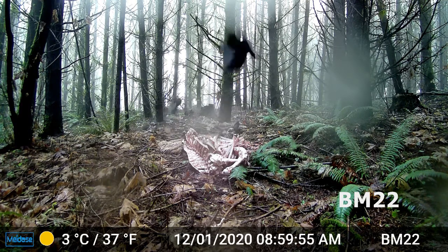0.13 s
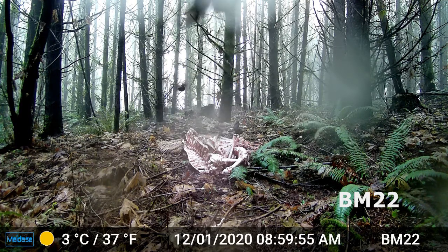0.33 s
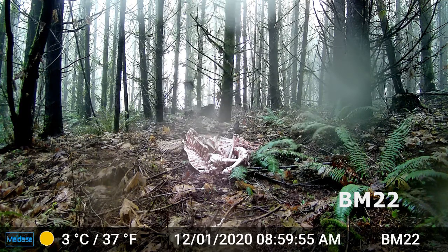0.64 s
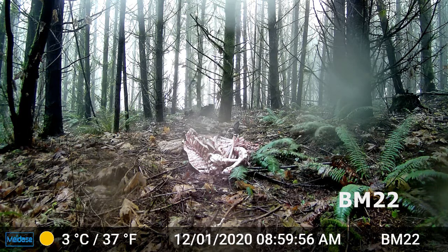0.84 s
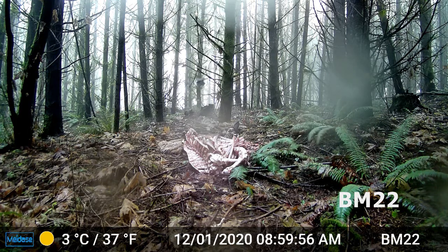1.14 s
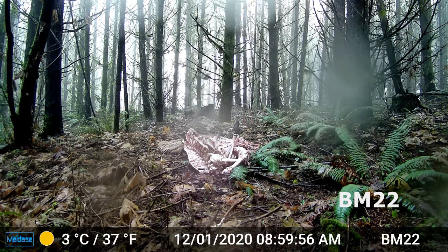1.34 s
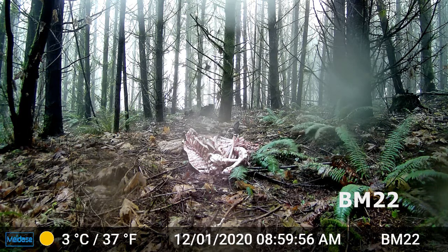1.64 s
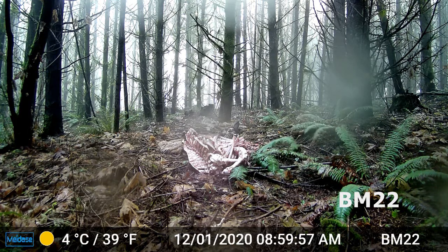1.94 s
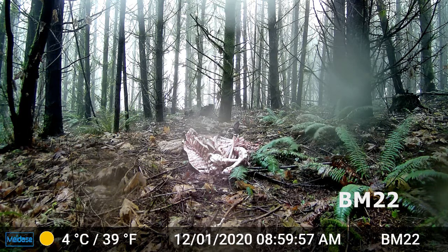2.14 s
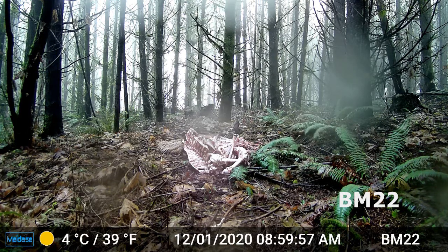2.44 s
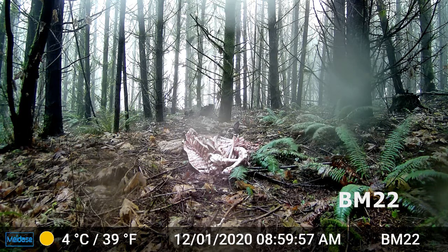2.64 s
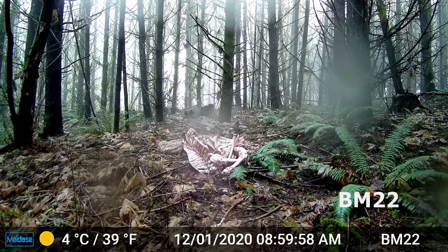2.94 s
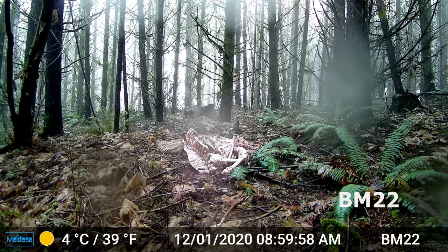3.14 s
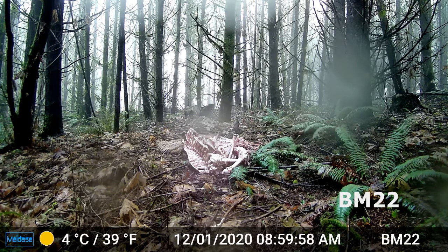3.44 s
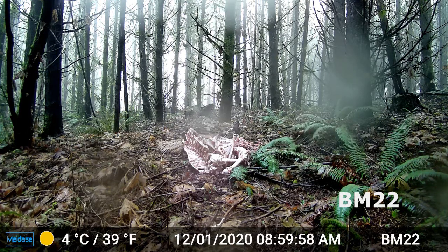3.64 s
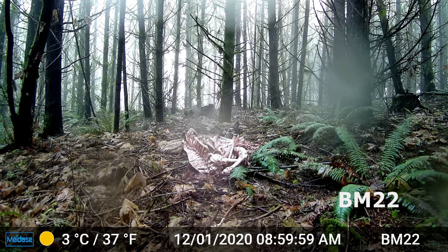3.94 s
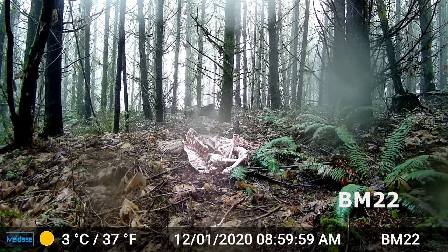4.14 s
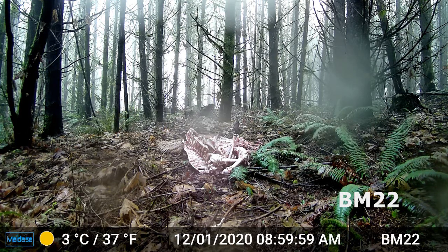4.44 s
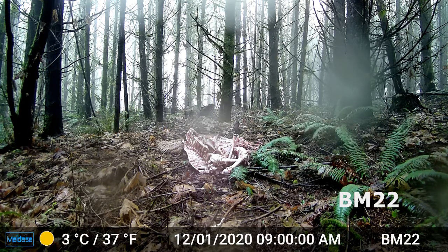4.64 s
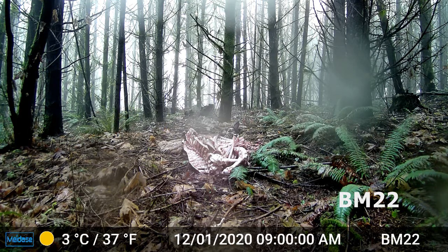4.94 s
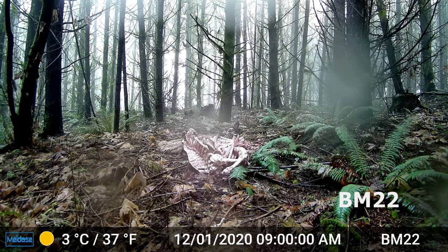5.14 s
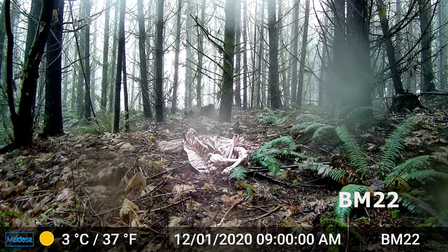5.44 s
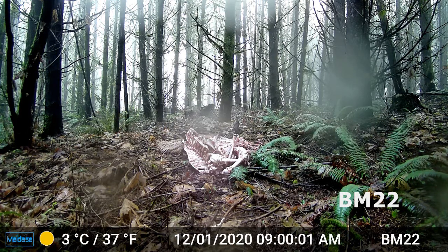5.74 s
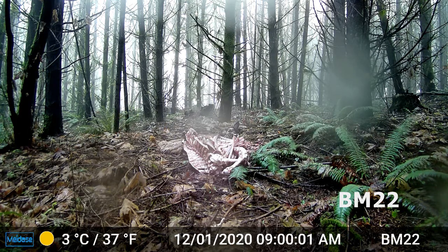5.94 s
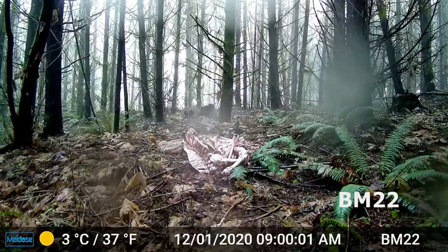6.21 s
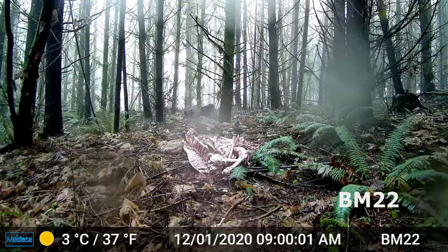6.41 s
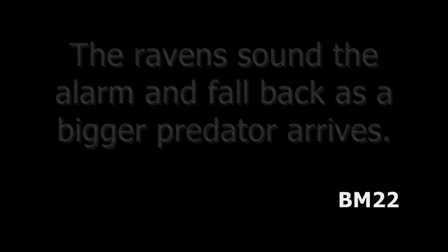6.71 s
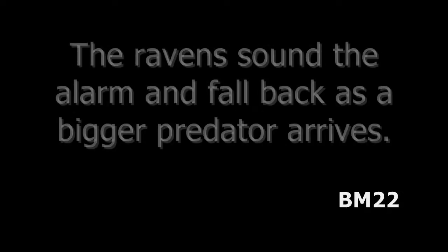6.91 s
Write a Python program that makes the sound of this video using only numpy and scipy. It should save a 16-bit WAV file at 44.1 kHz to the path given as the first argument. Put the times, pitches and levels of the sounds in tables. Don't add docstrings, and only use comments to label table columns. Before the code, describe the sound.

Close wing flaps, loud hoarse raven alarm caws, fainter distant answers, a quiet gap, then three more rough caws, cut off mid-call.

```python
import sys
import numpy as np
from scipy import signal
from scipy.fft import rfft, irfft, next_fast_len
from scipy.io import wavfile
from scipy.ndimage import map_coordinates

SR = 44100
rng = np.random.default_rng(int(sys.argv[2]) if len(sys.argv) > 2 else 0)


def invert_db(level):
    return 10 ** (np.asarray(level, dtype=float) / 20)


def transcribe(u):
    v = np.clip(np.atleast_2d(u).T, -1, 1)
    q = np.round(v * 32767).astype(np.int16)
    wavfile.write(sys.argv[1], SR, q)


N = 311787
TIME = np.arange(N) / SR

# centre_hz, width_hz, level_db
NEAR_PIPE = [(460, 370, -9.5), (1015, 460, 0.5), (1381, 387, 2.5)]
# centre_hz, width_hz, level_db
NEAR_BEAK = [(2610, 520, 0.8), (3780, 850, -1)]



def unit(x):
    return x / np.sqrt(np.mean(x ** 2) + 1e-20)


def along(points, hz):
    f, v = np.transpose(points)
    return np.interp(np.log(hz + 1), np.log(f + 1), v)


def wobble(rate_hz):
    knots = rng.standard_normal(int(N * rate_hz / SR) + 4)
    return map_coordinates(knots, [TIME * rate_hz])


def filtered(x, response):
    m = next_fast_len(N + SR // 2)
    hz = np.fft.rfftfreq(m, 1 / SR)
    return irfft(rfft(x, m) * response(hz), m)[..., :N]


def hiss(spectrum):
    return unit(filtered(rng.standard_normal(N), lambda hz: invert_db(along(spectrum, hz))))


def resonate(x, modes):
    def response(f):
        total = 0
        for k, (centre, width, db) in enumerate(modes):
            band = 1j * f * width
            total = total + (-1) ** k * invert_db(db) * band / (centre ** 2 - f ** 2 + band)
        return total
    return filtered(x, response)


def wind():
    # time_s, strength_db
    gusts = [(0.0, -45), (0.11, -34), (0.22, -43.5), (0.33, -27), (0.37, -45), (0.91, -41.5), (1.32, -52.5),
             (1.93, -42.5), (1.95, -53), (2.3, -39.5), (2.38, -51), (2.75, -30), (2.99, -47.5), (3.08, -36),
             (3.25, -41), (3.31, -30.5), (3.53, -48.5), (6.67, -46.5)]
    # freq_hz, density_db
    hush = [(76, -24.5), (130, -3.5), (175, -10.5), (205, -17), (339, -19.5), (419, -22.5), (593, -21),
            (1350, -29.5), (5170, -35), (8420, -42), (10900, -70.5), (18500, -120)]
    s, strength_db = np.transpose(gusts)
    mean_db = strength_db.mean()
    gust_db = np.interp(TIME, s, strength_db) - mean_db
    deep = hiss([(12, -44.0), (22, 6.5), (50, 2.5), (75, -30.0), (200, -120)])
    deep = unit(invert_db(3 * wobble(9.7)) * deep)
    upper = hiss([(30, -32.5), (58, 7.0), (110, -1), (170, -23.5), (260, -33), (600, -120)])
    upper = unit(invert_db(4 * wobble(14)) * upper)
    buffet = invert_db(-0.5 + 1.4 * gust_db) * deep + invert_db(0.6 * gust_db) * upper
    return invert_db(mean_db) * buffet + invert_db(-52 + wobble(5)) * hiss(hush)


def forest(x, early_db, late_db):
    # freq_hz, level_db
    scatter = [(500, -10), (1400, -10), (2500, -2), (6000, -1)]
    # freq_hz, t60_s
    trunks = [(300, .6), (600, .9), (1150, 1.75), (2500, 1.25), (6000, .8)]
    # delay_s, level_db
    echoes = [
        (.06, -27),
        (.19, -32),
    ]
    hz, t, z = signal.stft(rng.standard_normal(2 * SR), SR, nperseg=256)
    early = invert_db(early_db - 1.5 + along(scatter, hz)[:, None] - 60 * t / .42)
    late = invert_db(late_db - 60 * t / along(trunks, hz)[:, None])
    tail = signal.istft(z * (early + late), SR, nperseg=256)[1] / 50
    tail[:150] = 0
    blurs = rng.standard_normal((len(echoes), 2000)) * np.hanning(2000) / 27
    for (s, db), blur in zip(echoes, blurs):
        tail[round(s * SR) - 1000:][:2000] += invert_db(db) * blur
    return x + signal.fftconvolve(x, tail)[:N]


def wings():
    # time_s, thump_db, thump_hz, swish_db, length_s
    beats = [(.01, -30.5, 128, -40, 0.19), (.045, -27.5, 166.6, -31, 0.24), (0.062, -21, 121, -37.5, 0.053),
             (0.11, -17, 108, -38.5, 0.051), (.13, -33, 120, -23, 0.01), (.155, -22, 148, -28, 0.026),
             (.19, -25.5, 108, -44.5, .04), (.243, -18.5, 130, -45.5, 0.026),
             (.265, -29.5, 120, -26.5, .05), (.287, -28.5, 110, -33.5, .03), (.33, -19, 103.4, -40.5, 0.06),
             (.66, -34.5, 129, -39, 0.19), (0.721, -15, 164, -41, 0.018), (0.858, -20, 105, -47, 0.026),
             (0.944, -20.5, 149, -43, 0.035), (1.846, -44, 101, -43.5, 0.095),
             (1.911, -33, 70.6, -43.5, 0.046), (2.081, -49.5, 98.4, -49.5, 0.17)]
    # time_s, peak_db
    snap_events = [
        (0.0418, -17.5),
        (0.0594, -16),
        (0.1246, -27.5),
        (0.2433, -37),
        (0.2848, -14.5),
    ]
    # freq_hz, density_db
    feathers = [(180, -42), (300, 1), (891, -8.5), (1530, 0), (1950, -10), (3080, -8.5), (6740, -19),
                (8420, -28), (10900, -50.5), (18500, -120)]
    thump, swish, snaps = np.zeros((3, N))
    for s, thump_db, hz, swish_db, length_s in beats:
        since = TIME - s
        stroke = np.exp(-8 * (since / length_s) ** 2)
        puff = np.sin(2 * np.pi * hz * since) + 0.38 * np.sin(4 * np.pi * hz * since)
        thump += invert_db(thump_db) * stroke * puff
        swish += invert_db(swish_db) * stroke
    for s, db in snap_events:
        decay = invert_db(db + 6.5 - 60 * TIME[:200] / .003)
        snaps[round(s * SR):][:200] += decay * rng.standard_normal(200)
    rustle = swish * invert_db(3 * wobble(150)) * hiss(feathers)
    return thump + rustle + resonate(snaps, [(2500, 5000, 0)])


def arched(u, before, place, after):
    rising = np.clip(1 - u / place, 0, 1)
    falling = np.clip((u - place) / (1 - place), 0, 1)
    return before * rising ** 2 + after * falling ** 2


def raven(caws, way, pipe, beak, opened, rise, fall, gap_db, arch, jitter, breath, rasp, uneven, restarts=False):
    # centre_hz, width_hz, level_db
    gape = [(5016, 996, 1), (7590, 400, -16)]
    low, mid, top = np.zeros((3, N))
    shake, air = wobble(400), rng.standard_normal(N)
    for start_s, length_s, top_hz, top_db, first_hz in caws:
        at = np.arange(round(start_s * SR), round((start_s + length_s) * SR))
        u = np.linspace(0, 1, len(at))
        since_s = u * length_s

        last_hz, after_s = way["slows"]
        rattle_hz = last_hz + (first_hz - last_hz) * np.clip(1 - since_s / after_s, 0, 1)
        bursts = np.cumsum(rattle_hz) / SR
        within = bursts % 1 / np.linspace(*opened, len(at))
        swell = np.sin(np.pi / 2 * np.clip(within / rise, 0, 1)) ** 2
        decay = np.abs(np.cos(np.pi / 2 * np.clip((within - rise) / (1 - rise), 0, 1))) ** fall
        leak = invert_db(gap_db) * np.linspace(.4, 1.7, len(at))
        leak *= 1 - restarts * np.cos(np.pi * bursts) ** 2
        gate = (swell * decay + leak) * invert_db(1.2 * rng.standard_normal(64))[bursts.astype(int)]

        bend = 1 + arch * np.sin(2 * np.pi * bursts - .5) + jitter * shake[at]
        cycles = np.cumsum(top_hz * (1 - arched(u, *way["pitch"])) * bend) / SR
        cycles -= restarts * cycles[np.searchsorted(bursts, np.floor(bursts))] + .5
        harmonics = np.arange(1, 17)[:, None]
        pulses = np.cos(2 * np.pi * harmonics * cycles).sum(0) / np.sqrt(8)
        pulses *= 1 + uneven * np.cos(np.pi * cycles)
        puffs = air[at] * (1 + np.cos(2 * np.pi * cycles))

        onset = invert_db(-11 * np.clip(1 - since_s / way["swell_s"], 0, 1))
        release = np.clip((at[-1] - at) / (.008 * SR), 0, 1)
        effort = onset * release * invert_db(top_db - arched(u, *way["effort"]))
        leaky_gate = gate + invert_db(gap_db + 8)
        beak_gain = invert_db(np.linspace(*way["opens_db"], len(at)))
        hoarse = effort * beak_gain * (gate * pulses + rasp * leaky_gate * puffs)
        low[at] += effort * gate * (pulses + breath * puffs)
        mid[at] += hoarse
        top[at] += hoarse * invert_db(way["gape_db"])
    throat = signal.butter(3, [340, 2250], "bandpass", fs=SR, output="sos")
    low = signal.sosfilt(throat, resonate(low, pipe))
    mid = resonate(resonate(mid, beak), beak)
    top = resonate(resonate(top, gape), gape)
    return invert_db(14.0) * low + invert_db(3.5) * mid - invert_db(1.0) * top


def far_raven():
    # start_s, length_s, top_pitch_hz, top_effort_db, first_rattle_hz
    caws = [
        (2.885, .24, 548.9, -7.5, 100.1),
        (3.402, .23, 564.9, -8.5, 98.37),
    ]
    way = dict(pitch=(.25, .48, .2), effort=(11, 0.54, 7.2), slows=(51, .145), opens_db=(-32.5, -11),
           gape_db=-9, swell_s=.04)
    # centre_hz, width_hz, level_db
    pipe = [(530, 2100, -17), (1139, 145, 3.5), (1521, 300, -12.5)]
    # centre_hz, width_hz, level_db
    beak = [(2743, 500, 0.82), (4070, 820, -1.3)]
    return raven(caws, way, pipe, beak, (.55, .68), rise=.4, fall=1.3, gap_db=-11,
                 arch=.04, jitter=.03, breath=.5, rasp=2.6, uneven=.15)


def muttering_raven():
    # start_s, length_s, top_pitch_hz, top_effort_db, first_rattle_hz
    caws = [
        (0.718, .182, 413, -10, 92.8),
        (1.364, .146, 422.5, -13.5, 101.8),
    ]
    way = dict(pitch=(.2, 0.98, .03), effort=(12, 0.8, 4.5), slows=(47, 0.25), opens_db=(-26.5, -21.5),
           gape_db=-14, swell_s=0.013)
    # centre_hz, width_hz, level_db
    pipe = [(430, 290, -19.5), (680, 300, -14.5), (1153, 250, -2.5), (1304, 260, -3)]
    # centre_hz, width_hz, level_db
    beak = [(2420, 730, -1.5), (3400, 630, 0.5)]
    return raven(caws, way, pipe, beak, (.8, 1.1), rise=.4, fall=1, gap_db=-12,
                 arch=.025, jitter=.036, breath=.8, rasp=2, uneven=.3)


def answering_raven():
    # start_s, length_s, top_pitch_hz, top_effort_db, first_rattle_hz
    caws = [
        (2.34, .345, 451.5, -22.5, 56.1),
    ]
    way = dict(pitch=(.11, .5, 0.22), effort=(2, 0.077, 17), slows=(44, .25), opens_db=(-4.5, -6.5),
           gape_db=-6, swell_s=0.075)
    return raven(caws, way, NEAR_PIPE, NEAR_BEAK, (1.1, 1.5), rise=.3, fall=.7, gap_db=-6,
                 arch=.04, jitter=.04, breath=.9, rasp=2, uneven=.35)


def high_raven():
    # start_s, length_s, top_pitch_hz, top_effort_db, first_rattle_hz
    caws = [
        (5.284, 0.33, 447, -16.5, 97.2),
        (5.905, .29, 460, -16, 75.1),
        (6.599, .2, 436, -16, 94),
    ]
    way = dict(pitch=(.11, .65, 0.0873), effort=(15, 0.64, 9.1), slows=(48.5, .26), opens_db=(-6, -11.5),
           gape_db=-7, swell_s=.024)
    # centre_hz, width_hz, level_db
    pipe = [(400, 480, -19), (680, 100, -11), (1165, 240, 5.5), (1303, 240, 6)]
    # centre_hz, width_hz, level_db
    beak = [(2740, 460, 3), (5300, 500, -9), (3500, 520, 2), (7200, 900, -9)]
    return raven(caws, way, pipe, beak, (.6, 1.25), rise=.28, fall=.9, gap_db=-12,
                 arch=.04, jitter=.03, breath=.65, rasp=1.5, uneven=.35)


def leaving_raven():
    # start_s, length_s, top_pitch_hz, top_effort_db, first_rattle_hz
    caws = [
        (1.485, .233, 494.6, -13, 68.2),
        (2.252, .268, 513.1, -16, 75.23),
    ]
    way = dict(pitch=(0.26, 0.5, 0.26), effort=(15, 0.34, 9.7), slows=(41, 0.24), opens_db=(-16, -7.5),
           gape_db=-12, swell_s=0.014)
    return raven(caws, way, NEAR_PIPE, NEAR_BEAK, (.55, 1.1), rise=.3, fall=.8, gap_db=-10,
                 arch=.05, jitter=.035, breath=.6, rasp=1.9, uneven=.25)


def near_raven():
    # start_s, length_s, top_pitch_hz, top_effort_db, first_rattle_hz
    caws = [
        (0.379, .243, 509.6, -1, 99.63),
        (0.869, .203, 487, -8.5, 86),
    ]
    way = dict(pitch=(0.35, .55, .27), effort=(11, .4, 8.7), slows=(47, .15), opens_db=(-4, 0.5),
           gape_db=-9.5, swell_s=0.003)
    return raven(caws, way, NEAR_PIPE, NEAR_BEAK, (.35, 1.3), rise=.05, fall=.6, gap_db=-14,
                 arch=.06, jitter=.016, breath=.2, rasp=.65, uneven=.22, restarts=True)


def scene():
    far = forest(far_raven(), early_db=1, late_db=-27.5)
    middle = high_raven() + answering_raven() + muttering_raven() + leaving_raven()
    middle = forest(middle, early_db=1, late_db=-29.0)
    near = forest(near_raven() + wings(), early_db=-5, late_db=-34.5)
    mono = wind() + far + middle + near
    return np.array([mono, mono])


def roll_off(x):
    return signal.sosfilt(signal.butter(12, 15800, fs=SR, output="sos"), x)


def record(dry):
    camera_hz, stop_s = 16000, 6.6764
    x = dry / (1 + np.abs(dry / 1.05) ** 7) ** (1 / 7)
    image_db = [(8900, -60), (9600, 9), (11500, -0.5), (14000, -14.5), (15200, -38.5)]
    lowpass_db = [(7600, -3.5), (8300, -8.5), (8650, -16.5), (8900, -78.5)]
    mirror = x * np.cos(2 * np.pi * camera_hz * TIME)
    mirror = filtered(mirror, lambda hz: invert_db(along(image_db, hz)))
    x = filtered(x, lambda hz: invert_db(along(lowpass_db, hz))) + invert_db(-44) * mirror
    x = np.clip(x, -.93, .93) * np.clip((stop_s - TIME) / .0003, 0, 1)
    x[:, round(stop_s * SR) - 44:][:, :10] += invert_db(-6.0) * np.hanning(10)
    return roll_off(x)


dry = scene()
out = record(dry)
transcribe(out)
```